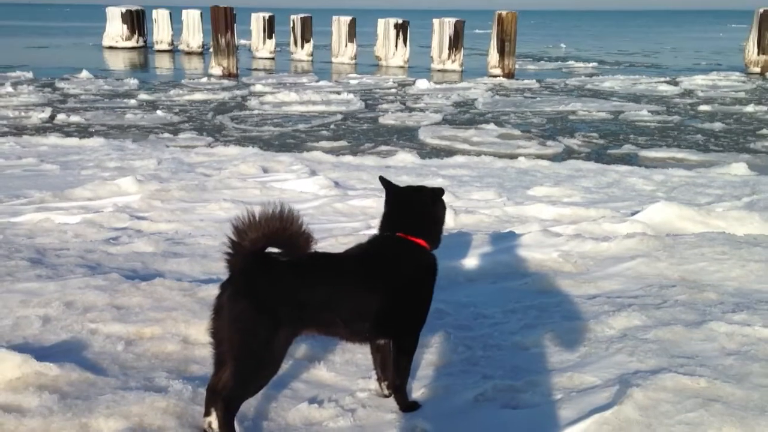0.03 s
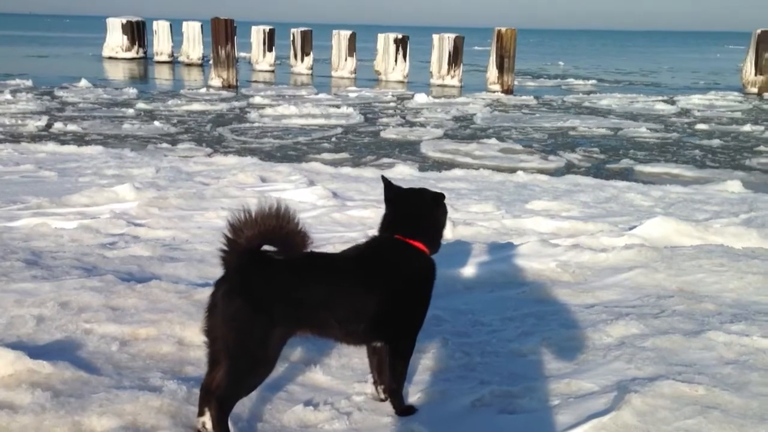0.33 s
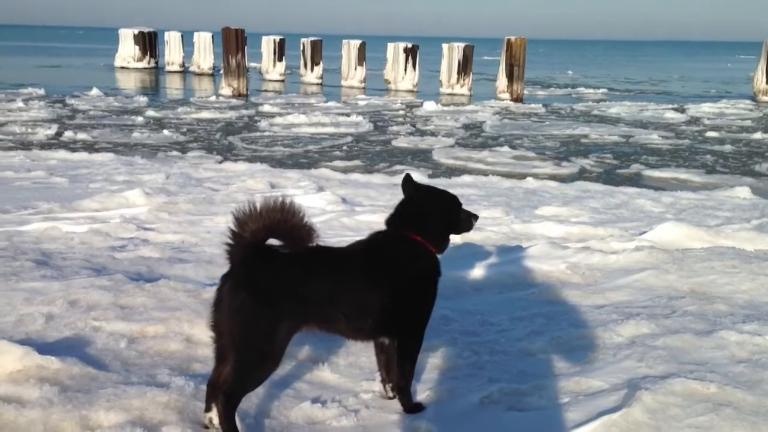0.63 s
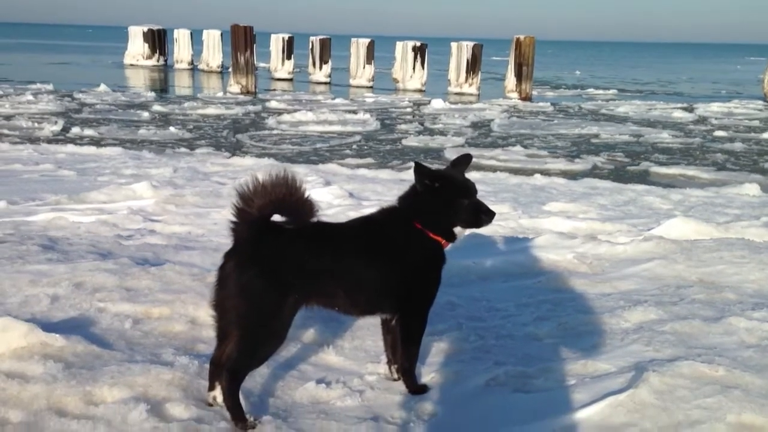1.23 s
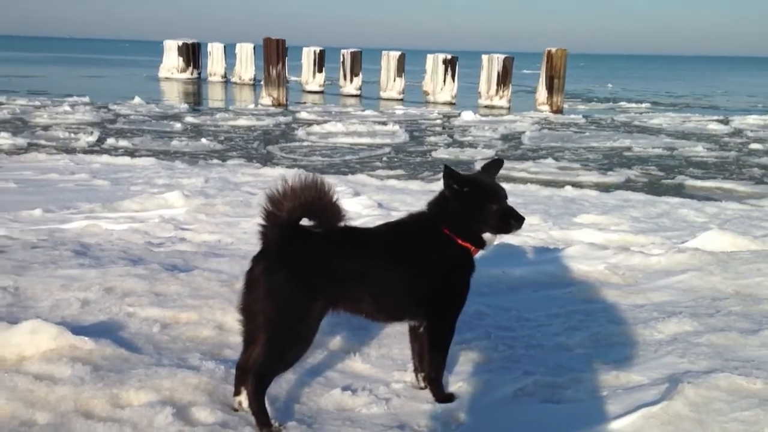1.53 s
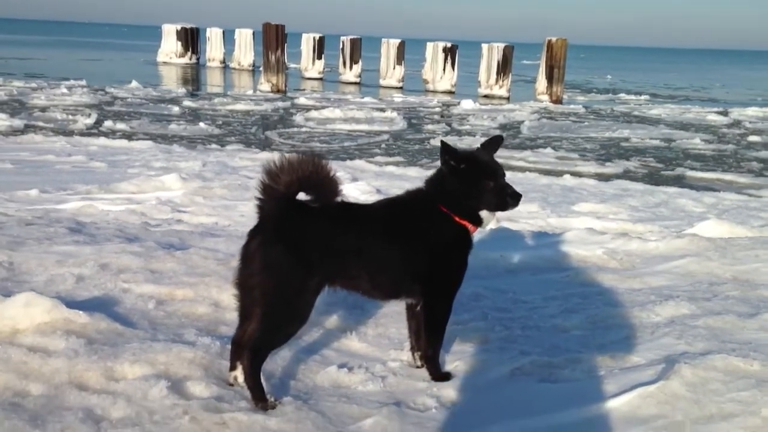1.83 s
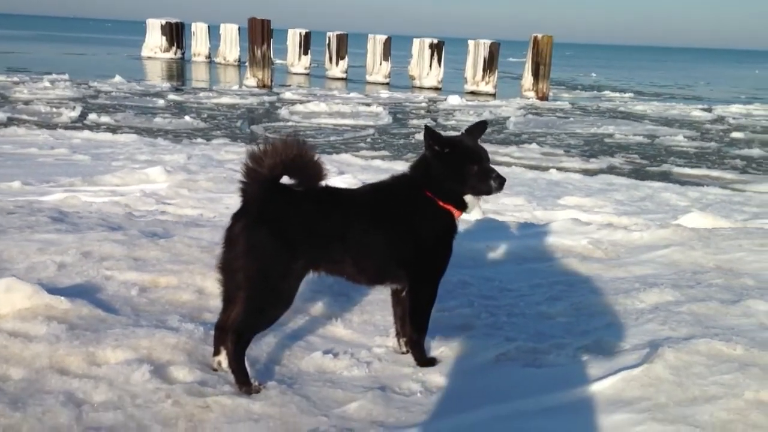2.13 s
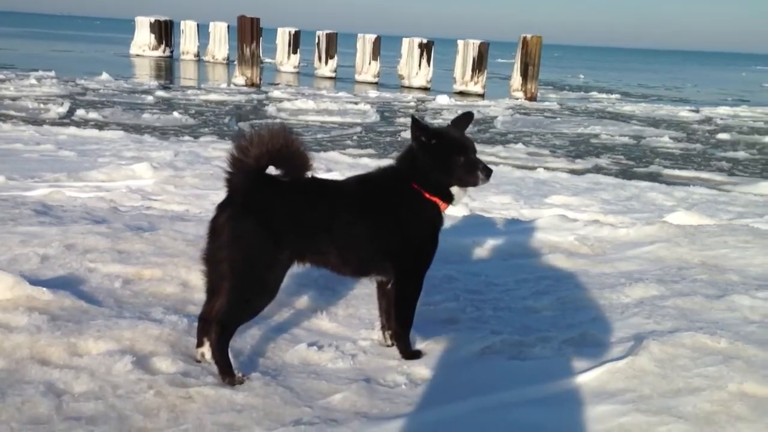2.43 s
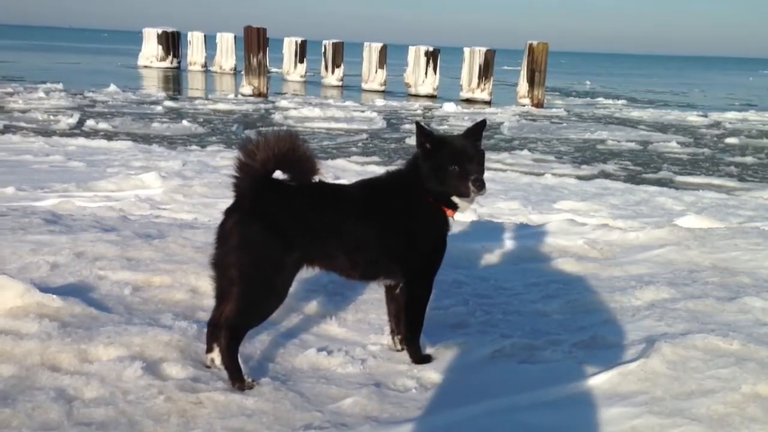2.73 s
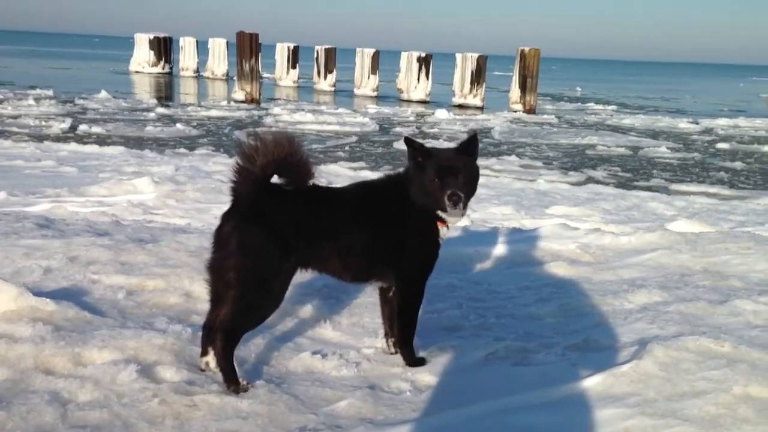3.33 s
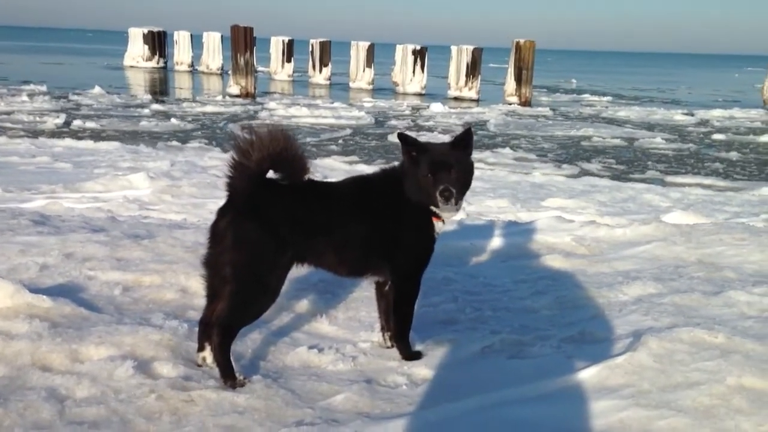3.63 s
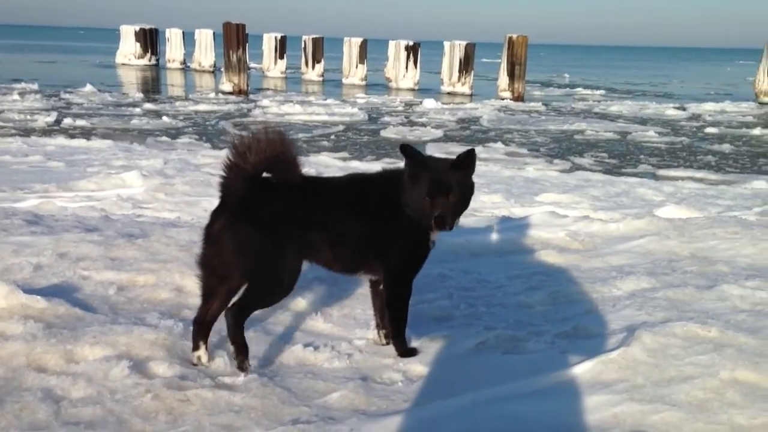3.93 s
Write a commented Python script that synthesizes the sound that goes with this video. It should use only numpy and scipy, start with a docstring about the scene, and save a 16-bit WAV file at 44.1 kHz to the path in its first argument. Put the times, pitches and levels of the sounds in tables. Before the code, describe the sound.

Wind thumps and rumbles on the microphone in growing gusts, with faint lake water behind.

```python
"""Gusty wind at a frozen lakeshore hits the bare microphone of a hand-held camera.
From the start the open water washes steadily, the microphone hisses, and turbulent flurries rumble.
Within the first second slush fizzes faintly and strong eddies begin to pass the microphone's port,
each a short pressure pulse: a thump, higher when the eddy is fast. The wind builds, buffets hardest
from 2.5 to 3.5 s, drops briefly and returns just before the end."""
import sys
import numpy as np
from scipy import signal
from scipy.fft import rfft, irfft, next_fast_len
from scipy.io import wavfile
from scipy.ndimage import uniform_filter1d, map_coordinates

SR = 44100
rng = np.random.default_rng(int(sys.argv[2]) if len(sys.argv) > 2 else 0)


def put_to_file(sound):
    """Save the sound as 16-bit audio at rate SR, in the file named by the first command-line argument."""
    columns = np.atleast_2d(sound).T  # one column per channel
    safe = np.clip(columns, -1, 1)
    whole_steps = np.round(safe * 32767)
    wavfile.write(sys.argv[1], SR, whole_steps.astype(np.int16))


N = 176400
TIME = np.arange(N) / SR


def amp(db):
    """Amplitude ratio of a level in decibels."""
    return 10 ** (np.asarray(db) / 20)


def unit_rms(x):
    """Normalisation to an rms of 1."""
    return x / np.sqrt(np.mean(x ** 2) + 1e-20)


def wobble(knots_per_s):
    """Smooth random modulation: a spline through Gaussian knots."""
    knots = rng.standard_normal(int(N * knots_per_s / SR) + 4)
    return map_coordinates(knots, [np.arange(N) * knots_per_s / SR])


def filtered(x, response):
    """Linear filtering: the spectrum is multiplied by a frequency response."""
    size = next_fast_len(N + SR // 2)
    return irfft(rfft(x, size) * response(np.fft.rfftfreq(size, 1 / SR)), size)[:N]


def noise(spectrum, patchy_db=0):
    """Spectral shaping of white noise to rms 1, with optional random patches in time and frequency."""
    white = signal.stft(rng.standard_normal(N), nperseg=512)[2]
    patches = uniform_filter1d(rng.standard_normal(white.shape), size=5, axis=0)
    patches = uniform_filter1d(patches, size=16, axis=1)
    patchy = signal.istft(white * amp(patchy_db * unit_rms(patches)), nperseg=512)[1][:N]
    knot_hz, db = np.transpose(spectrum)
    return unit_rms(filtered(patchy, lambda hz: amp(np.interp(np.log(hz + 1), np.log(knot_hz), db))))


def contour(rows):
    """Amplitude envelope, interpolated linearly in decibels."""
    return amp(np.interp(TIME, *np.transpose(rows)))


def swells(rows):
    """Incoherent addition: an envelope of Gaussian swells whose powers add."""
    return np.sqrt(sum(amp(db) ** 2 * np.exp(-2 * ((TIME - s) / half) ** 2) for s, half, db in rows))


def wind_filter(x, cutoff_hz=126.8, leak_db=-45):
    """High-pass filtering in the microphone: every push swings back; a little deep rumble leaks past."""
    highpass = signal.butter(N=4, Wn=cutoff_hz, btype="high", fs=SR, output="sos")
    return signal.sosfilt(highpass, x) + amp(leak_db) * x


# Spectrum of the hiss (frequency [Hz], relative level [dB])
HISS_SPECTRUM = [(100, 5.5), (2000, -9.5), (2700, -4.5), (3100, -2), (4000, -0.5), (5000, -2), (7000, -5.5),
                 (10000, -8), (15000, -11.5)]
# Envelope of the hiss (time [s], level [dB])
HISS_ENVELOPE = [(0, -66), (1.1, -65.5), (1.55, -64.5), (1.85, -65.5), (2.6, -65.5), (3.45, -64.5),
                 (4, -65)]


def microphone_hiss():
    """Self-noise: the microphone adds a nearly constant broadband floor."""
    return contour(HISS_ENVELOPE) * noise(HISS_SPECTRUM)


# Spectrum of the open water (frequency [Hz], relative level [dB])
WASH_SPECTRUM = [(100, -15), (220, -11.5), (400, -3.5), (800, -1.5), (1100, -3), (1400, -6), (1700, -7),
                 (2100, -14.5), (2600, -20), (4000, -31)]
# Envelope of the open water (time [s], level [dB])
WASH_ENVELOPE = [(0, -54.5), (.8, -55), (2, -55), (3, -55), (4, -53)]


def water_wash():
    """Nearly stationary noise: distant open water washes with a slightly fluctuating spectrum."""
    return contour(WASH_ENVELOPE) * noise(WASH_SPECTRUM, patchy_db=1.24)


# Flurries over the port (centre time [s], half duration [s], level [dB])
FLURRY_SWELLS = [(.04, 0.024, -52.5), (.27, 0.022, -49.5), (.515, 0.022, -47.5), (.645, .03, -45),
                 (.84, 0.018, -42), (.895, 0.022, -39.5), (.96, 0.028, -46.5), (1.055, 0.021, -40.5),
                 (1.145, 0.011, -40.5), (1.335, .025, -41.5), (1.44, 0.042, -36.5), (1.485, 0.094, -45),
                 (1.603, 0.019, -39.5), (1.755, 0.041, -36.5), (1.82, .025, -39.5), (1.89, 0.016, -35.5),
                 (2.145, 0.035, -43), (2.33, 0.062, -38), (2.43, 0.036, -37.5), (2.6, 0.11, -35.5),
                 (2.8, 0.065, -36), (2.905, 0.023, -34), (3.175, 0.056, -31), (3.24, 0.0059, -31),
                 (3.375, 0.071, -30), (3.455, 0.038, -30), (3.525, 0.014, -35.5), (3.655, 0.051, -46),
                 (3.83, 0.084, -48.5), (3.925, 0.039, -35), (3.98, 0.013, -35.5)]
# Spectrum of the turbulent rumble (frequency [Hz], relative level [dB])
RUMBLE_SPECTRUM = [(20, -10), (50, 9), (90, 0), (140, 3), (230, 4), (320, -7), (480, -17.5), (700, -42),
                   (1200, -65), (3000, -120)]
# Spectrum of the rasp of fast flow (frequency [Hz], relative level [dB])
RASP_SPECTRUM = [(100, -30), (300, -6.5), (480, -1), (650, -17), (900, -25.5), (1300, -45), (3000, -120)]


def turbulence(breeze_db=-54.5, flutter_db=1.6, rasp_db=-14, reference_db=-35.5, rasp_exponent=1.85):
    """Turbulent pressure fluctuation: rasp grows faster than rumble, so strong flurries are brighter."""
    rumble, rasp = noise(RUMBLE_SPECTRUM), noise(RASP_SPECTRUM)
    flutter = amp(flutter_db * wobble(knots_per_s=79))
    flow = np.hypot(swells(FLURRY_SWELLS), amp(breeze_db)) * flutter
    # rasp_db is the rasp's share, before the filter, when the flow is at reference_db
    rasp_gain = amp(reference_db + rasp_db) * (flow / amp(reference_db)) ** rasp_exponent
    return wind_filter(flow * rumble / wind_filter(rumble).std() + rasp_gain * rasp)


# Spectrum of the slush (frequency [Hz], relative level [dB])
FIZZ_SPECTRUM = [(1500, -18), (2700, -5.5), (2950, -3), (3100, 4.5), (3400, 0), (4100, -1.5), (5500, -11),
                 (8000, -15), (15000, -28)]
# Swells of the fizz (centre time [s], half duration [s], level [dB])
FIZZ_SWELLS = [(.68, 0.45, -68), (1.44, 0.085, -64), (2.23, 0.024, -65.5)]


def slush_fizz():
    """Amplitude-modulated noise: slush at the water's edge fizzes in faint swells of treble."""
    return swells(FIZZ_SWELLS) * noise(FIZZ_SPECTRUM)


def vortex(position):
    """Pressure profile of a vortex: suction between two pushes."""
    return (position ** 2 - 1) * np.exp(-position ** 2 / 2)


# Strong eddies at the port (time [s], relative peak level [dB], nominal pitch [Hz])
EDDY_PASSAGES = [(0.7661, -23, 325), (.879, -22.5, 210), (.905, -28, 280), (1.0602, -27, 176),
                 (1.142, -30, 282), (1.3125, -24.5, 250), (1.3593, -28.5, 336), (1.439, -33, 274),
                 (1.7287, -22.5, 330), (1.753, -26.5, 208), (1.769, -41, 182), (1.891, -28.5, 314),
                 (2.035, -33, 232), (2.2827, -29.5, 320), (2.302, -22, 174), (2.335, -26.5, 210),
                 (2.536, -16, 243), (2.548, -5.5, 420), (2.552, -12.5, 210), (2.597, -27, 226),
                 (2.6155, -18, 305), (2.6567, -18.5, 305), (2.7769, -17.5, 288), (2.7871, -13, 467),
                 (2.793, -15, 310), (2.811, -7, 270), (2.8219, -22.5, 234), (3.124, -25, 209),
                 (3.138, -18, 402), (3.146, -18.5, 416), (3.1714, -20, 289), (3.181, -17.5, 250),
                 (3.1957, -16.5, 280), (3.22, -25, 385), (3.338, -10.5, 235), (3.349, -17.5, 246),
                 (3.392, -16.5, 330), (3.3966, -10.5, 292), (3.418, -13.5, 400), (3.4828, -13.5, 308),
                 (3.490, -21, 380), (3.842, -19.5, 253), (3.899, -21.5, 237), (3.9585, -20, 364)]


def eddy_thumps(width_rad=1.68, gain_db=-0.5, core_db=-10.5, core_tightness=1.83):
    """Convected vortices: a faster passage gives a shorter pressure pulse and so a higher thump."""
    out = np.zeros(N)
    for centre_s, db, hz in EDDY_PASSAGES:
        near = np.flatnonzero(np.abs(TIME - centre_s) < .04)
        position = 2 * np.pi * hz * (TIME[near] - centre_s) / width_rad
        core = amp(core_db + db) * vortex(core_tightness * position)  # prominent in strong eddies
        thump = wind_filter(vortex(position) + core)
        out[near] += amp(db + gain_db) * thump / np.abs(thump).max()
    return out


# Spectrum of the swirl around an eddy (frequency [Hz], relative level [dB])
SWIRL_SPECTRUM = [(100, -18), (300, -3.5), (500, 6.5), (750, -7), (1050, -14.5), (1400, -40), (2000, -44),
                  (3200, -120)]


def eddy_swirls(half_duration_s=0.0047, relative_db=-21.5):
    """Small-scale turbulence: a brief burst of noise surrounds each eddy, in proportion to its peak."""
    bursts = [(centre_s, half_duration_s, db + relative_db) for centre_s, db, _ in EDDY_PASSAGES]
    return wind_filter(swells(bursts) * noise(SWIRL_SPECTRUM))


def scene():
    """Superposition: hiss, lake and wind add in one channel."""
    background = microphone_hiss() + water_wash() + slush_fizz()
    wind = eddy_thumps() + eddy_swirls() + turbulence()
    return (background + wind)[None]


def record(dry, band_limit_hz=15400):
    """Band limiting: the camera passes nothing above its highest frequency."""
    return filtered(dry[0], lambda hz: hz < band_limit_hz)[None]


dry = scene()
out = record(dry)
put_to_file(out)
```